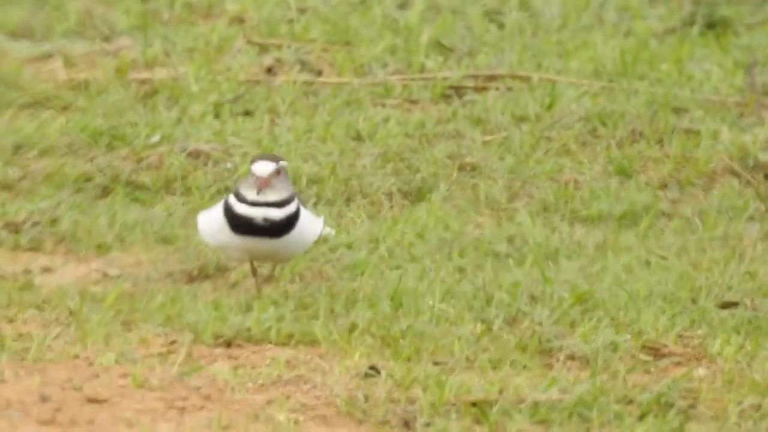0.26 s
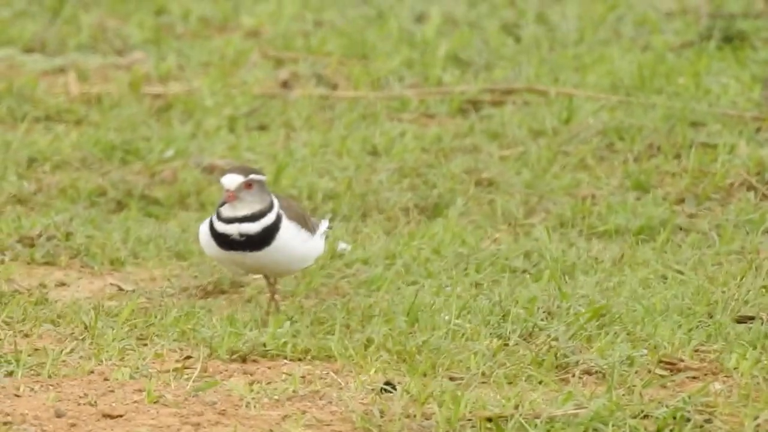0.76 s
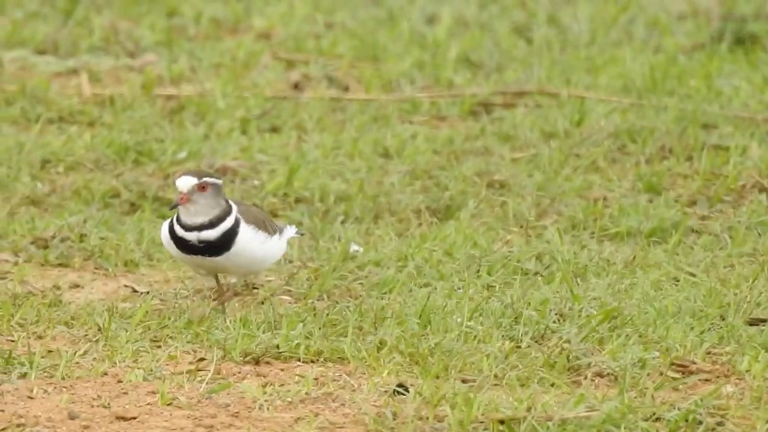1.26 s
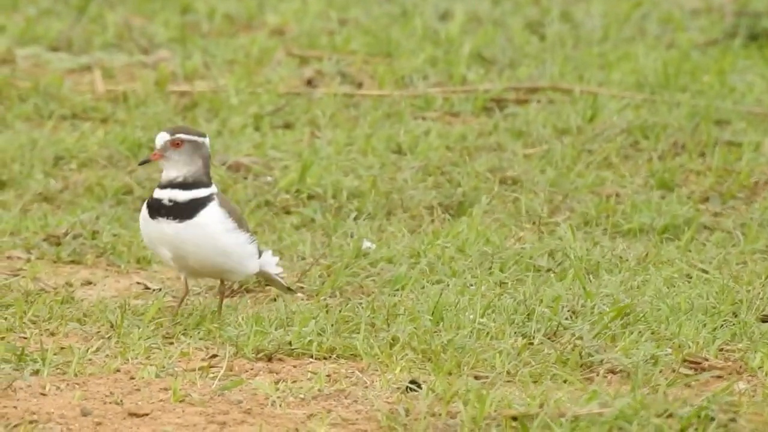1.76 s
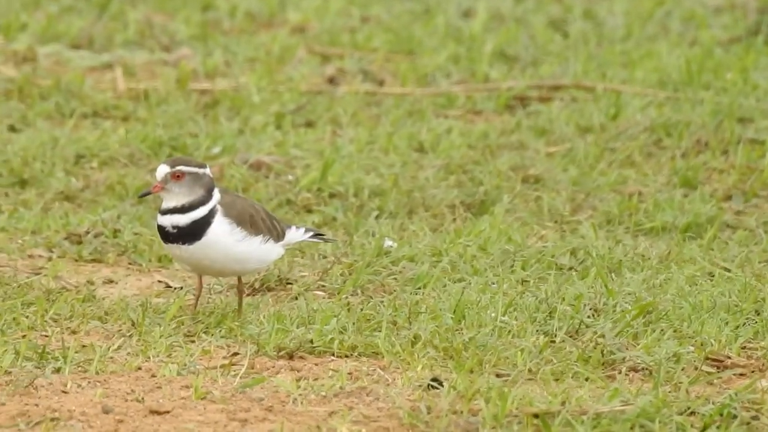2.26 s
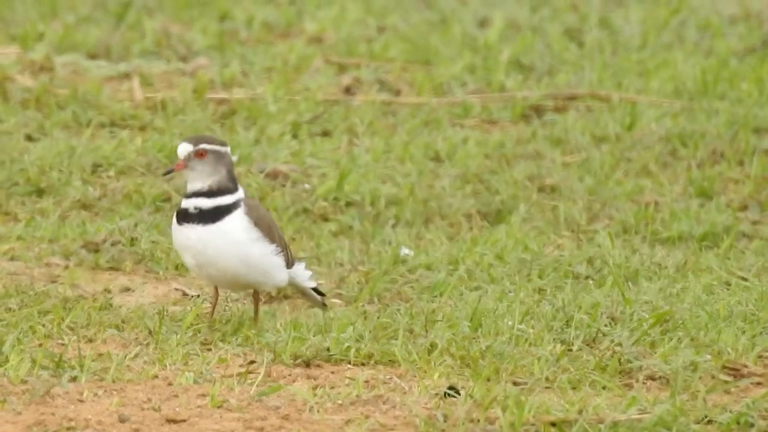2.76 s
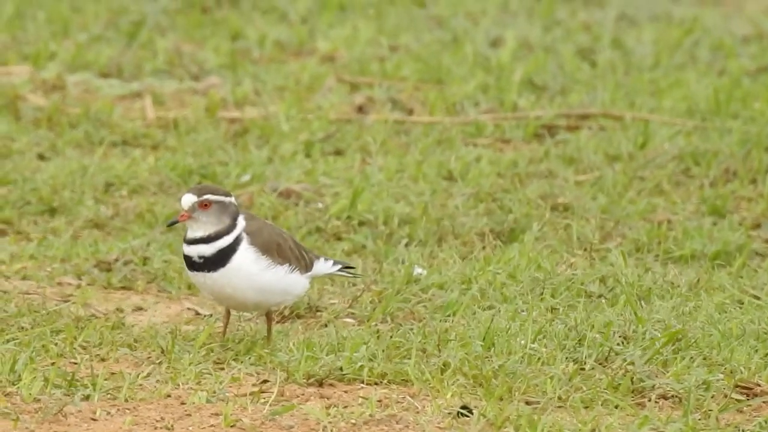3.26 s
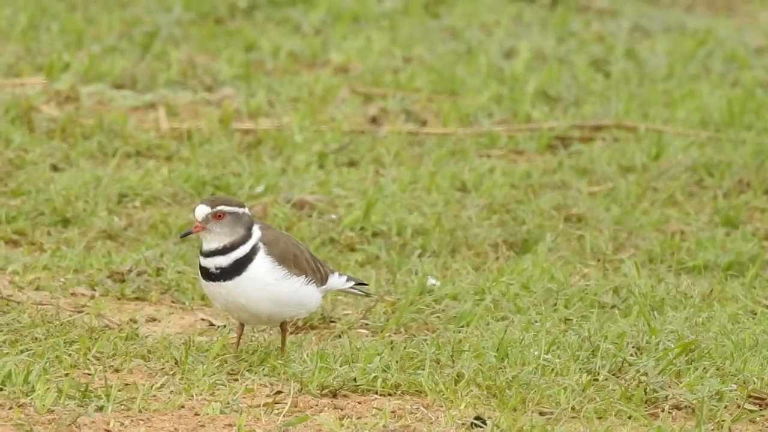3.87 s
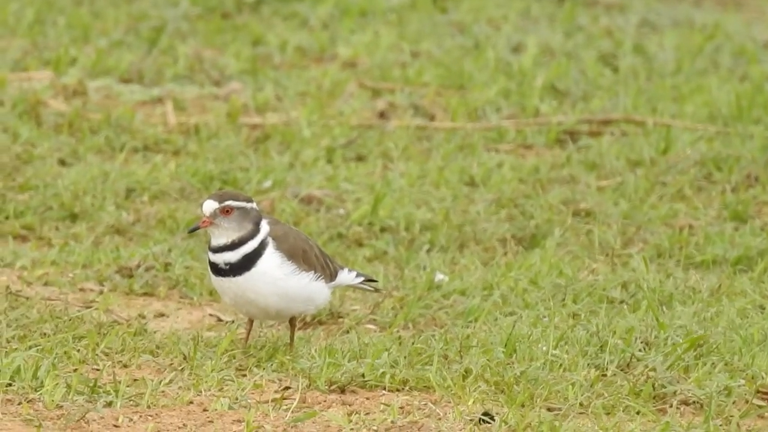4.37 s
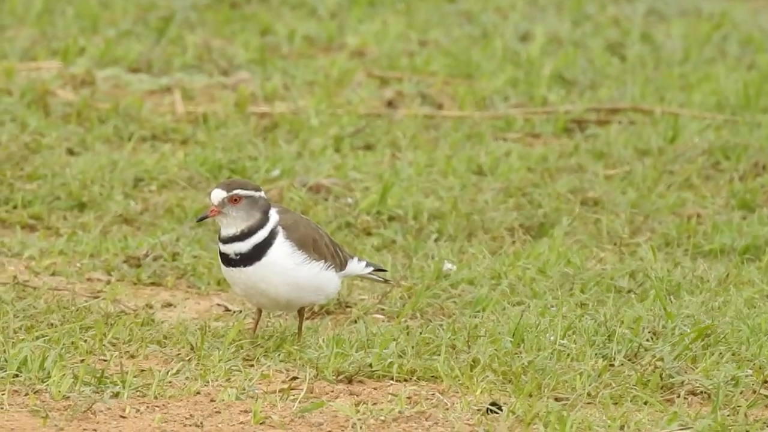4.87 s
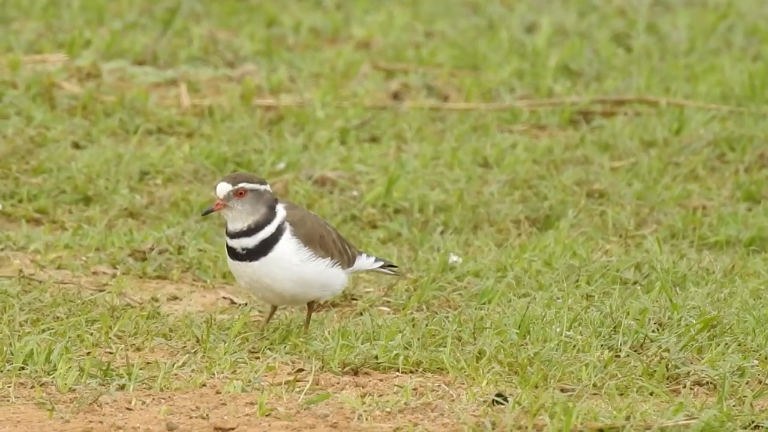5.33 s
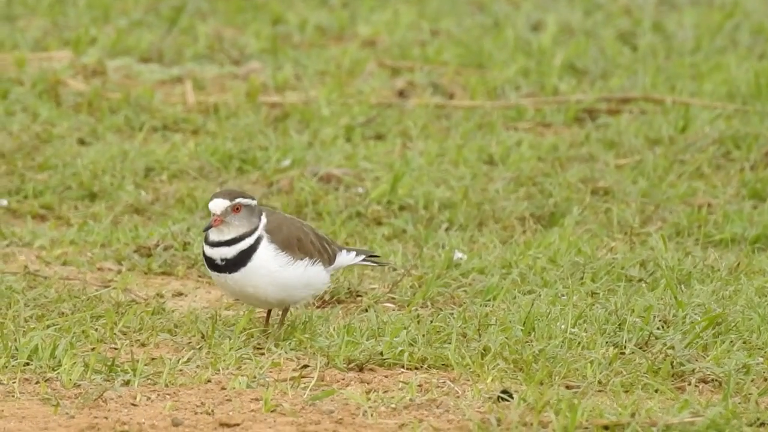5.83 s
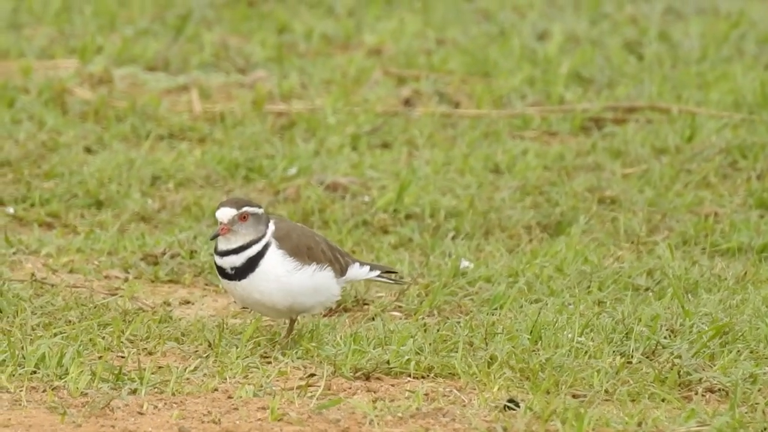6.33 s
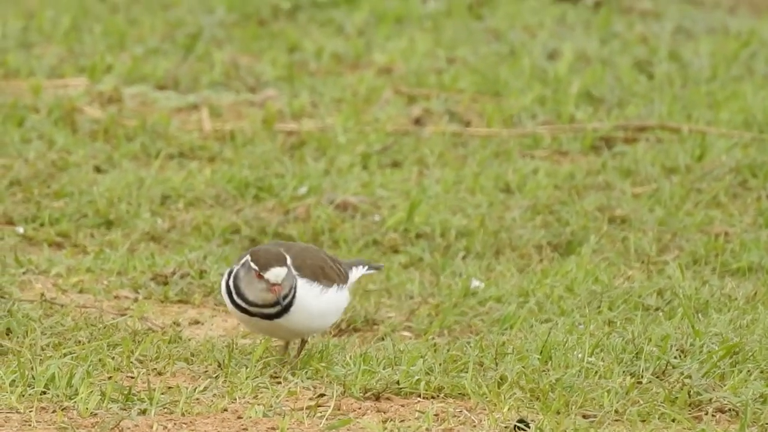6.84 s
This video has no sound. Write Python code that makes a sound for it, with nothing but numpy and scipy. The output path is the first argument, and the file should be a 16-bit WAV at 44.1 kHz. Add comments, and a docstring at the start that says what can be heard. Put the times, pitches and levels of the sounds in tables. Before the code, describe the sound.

In open country near water, distant waterfowl give faint nasal cries over a soft, steady hiss. A far plover calls twice, and a songbird slurs a thin falling phrase among tiny peeps. Then a plover close to the microphone gives five short, sharp, high whistles, three and then two, each flicking upward at the end. They are far louder than everything else.

```python
"""Plovers by the water

Over a soft outdoor hiss, distant waterfowl give nasal cries, a songbird slurs thin whistles and small
birds peep. A far plover calls twice; then one close by on short grass gives five sharp rising whistles.
Each is a near sine from the syrinx, opened by a stutter of ticks and scattered by grass, banks and
bushes. The loudest notes just clip."""
import sys
import numpy as np
from scipy import signal
from scipy.fft import rfft, irfft
from scipy.io import wavfile

SR = 44100
rng = np.random.default_rng(int(sys.argv[2]) if len(sys.argv) > 2 else 0)


def dump_mix(stems):
    """Bounce the given channels to the path in sys.argv[1] as a 16-bit WAV at rate SR."""
    frames = np.atleast_2d(stems).T  # one column per channel
    limited = np.clip(frames, -1, 1)  # hard clip at full scale
    pcm = np.round(limited * 32767).astype(np.int16)
    wavfile.write(sys.argv[1], SR, pcm)


N = 313110
TIME = np.arange(N) / SR

# The colour of the hiss. Each row: frequency in Hz, relative spectral level in dB.
HISS_SPECTRUM = [(500, -57), (700, -51), (900, -35), (1100, -26.5), (1400, -15), (1800, -12), (2300, -3),
                 (2800, 1), (3400, -1), (4700, -4), (8000, -8), (15000, -12.5)]
# The nearer waterfowl. Each row: start in seconds, length in seconds, top pitch in Hz,
# final fall as a share of that pitch, relative level in dB, throat resonance in Hz.
FOWL_CRIES = [(-.15, .34, 499, 0.07, -63, 1824), (0.391, 0.35, 544, 0.088, -55.5, 2080),
              (0.707, .27, 556, 0.14, -59.5, 2130), (1.0, .46, 495.6, .09, -62, 1660),
              (1.45, 0.31, 472, 0.088, -68.5, 1500), (2.04, 0.4, 543, 0.13, -56.5, 2040),
              (2.23, .14, 516, 0.059, -56, 1480), (2.339, 0.23, 555, 0.11, -59.5, 2070),
              (3.329, .42, 491.5, .076, -62.5, 1510), (3.657, 0.25, 538, 0.054, -58.5, 2200),
              (4.45, .36, 501.5, 0.054, -59, 1370), (5.03, 0.57, 499.3, .16, -61, 1730),
              (5.02, .4, 512, .07, -56.5, 3010), (5.598, 0.17, 483.6, .041, -60, 1370),
              (5.919, .2, 523, 0.054, -64, 2190)]
# Three timbres: nasal waterfowl, far birds (air swallows their overtones) and the close plover.
# Each row: multiple of the pitch, relative level in dB.
NASAL_HARMONICS = [(3, -4), (4, 1), (5, 2), (6, 0)]
DISTANT_HARMONICS = [(1, 1.5), (2, -45)]
PLOVER_HARMONICS = [(1, 0), (2, -30), (3, -46)]
# The songbird's two slurs, one falling, one stepped and dipping.
# Each row of a slur: time in seconds, pitch in Hz, relative level in dB.
SONG_SLURS = [
    [(2.83, 4850, -61), (2.85, 4808, -51), (2.924, 4420, -51.5), (2.976, 4240, -44.5), (3.02, 4106, -49),
     (3.052, 4000, -41), (3.075, 3750, -65)],
    [(3.165, 4308, -58), (3.189, 4066, -47), (3.225, 4113, -46.5), (3.269, 4180, -52), (3.285, 3880, -56),
     (3.325, 3856, -46.5), (3.419, 3560, -46), (3.479, 3510, -47), (3.595, 3615, -59), (3.61, 3725, -68)],
]
# The phrase comes three times, the first just a tail. Each row: time shift in seconds, gain in dB,
# stretch factor of the pitch range around the song's low note.
SONG_REPEATS = [(-3.492, 13, 1.6), (0, 3.5, 1), (4.15, 7.5, 1)]
# Faint small birds. Each row: start in seconds, length in seconds, top pitch in Hz, relative level in dB.
PEEPS = [(1.031, .26, 3440, -65.5), (3.143, 0.075, 3140, -56), (3.207, .05, 3720, -55.5),
         (3.354, .07, 3320, -51.5), (4.006, .04, 3280, -58.5), (5.383, 0.087, 3245, -50.5),
         (5.456, 0.03, 3550, -56), (5.472, .041, 3150, -53), (5.68, .04, 3020, -57)]
# Plover notes, far and near. Each row: start and length in seconds; crest, middle and flick pitch in Hz;
# base level, fade and dip in dB; number of opening ticks, their spacing in seconds,
# last tick's pitch in Hz, last and first tick's level in dB.
FAR_NOTES = [(1.700, .106, 4910, 4665, 5610, -41.5, -3, 2, 1, .008, 4400, -55, -55),
             (1.972, .048, 4790, 4874, 5560, -34, 1.5, 0.35, 2, 0.008, 4470, -43, -46)]
NEAR_NOTES = [(4.603, 0.098, 4862, 4510, 5440, -3, 14, 3, 2, .0074, 4645, -17, -21.5),
              (4.876, 0.049, 4760, 4880, 5470, -6, 6.5, 6.5, 3, 0.0084, 4513, -14, -28),
              (5.164, 0.058, 4740, 4730, 5423, -6.5, 4, 4, 4, 0.0082, 4527, -8, -37),
              (5.840, .081, 4764, 4505, 5370, -3, 10.5, 9.5, 3, .0074, 4520, -9.5, -31.5),
              (6.135, .051, 4633, 4634, 5183, -8, 7.5, 2, 4, 0.0079, 4570, -23, -33)]


def from_db(db):
    """Decibels to gain."""
    return 10 ** (np.asarray(db) / 20)


def unit_rms(x):
    """Scale to unit power."""
    return x / np.sqrt(np.mean(x ** 2) + 1e-20)


def ease(u):
    """A smooth step from 0 to 1."""
    return np.sin(np.pi / 2 * np.clip(u, 0, 1)) ** 2


def filtered(x, order, hz, kind):
    """A Butterworth low, high or band pass."""
    return signal.sosfilt(signal.butter(order, hz, kind, fs=SR, output="sos"), x)


def drift(rate_hz):
    """Smooth random modulation of unit power."""
    return unit_rms(filtered(rng.standard_normal(N + SR), 4, rate_hz, "low")[SR:])


def partials(hz, harmonics):
    """A harmonic tone that follows a pitch curve."""
    phase = 2 * np.pi * (np.cumsum(hz) / SR + rng.random())
    return sum(from_db(db) * np.sin(k * phase) for k, db in harmonics)


def during(start, length):
    """The samples of an event and its progress from 0 to 1."""
    at = np.flatnonzero((TIME > start) & (TIME < start + length))
    return at, (TIME[at] - start) / length


def scatter(x, t60, build_s):
    """Diffuse echoes from grass, banks and bushes build up, then die away."""
    t = TIME[:SR]
    echoes = rng.standard_normal(SR) * from_db(-60 * t / t60) * (1 - np.exp(-(t / build_s) ** 2))
    return signal.fftconvolve(x, echoes / np.linalg.norm(echoes))[:N]


def outdoor_hiss(level_db):
    """A steady bed of open-country air, with no bass."""
    points_hz, points_db = np.transpose(HISS_SPECTRUM)
    hz = np.maximum(np.arange(N // 2 + 1) * SR / N, 1)
    colour = from_db(np.interp(np.log(hz), np.log(points_hz), points_db))
    return from_db(level_db) * unit_rms(irfft(rfft(rng.standard_normal(N)) * colour, N))


def waterfowl(cries, scoop, crest_at, waver, throat_octaves):
    """Nasal cries scoop up, then sink as they fade; the throat favours the harmonic nearest its resonance."""
    out, wobble, fading = np.zeros(N), drift(40), drift(15)
    for start, length, hz, fall, db, throat_hz in cries:
        at, u = during(start, length)
        onset_bend = scoop * np.maximum(1 - u / crest_at, 0) ** 2
        tail_bend = fall * (np.maximum(u - crest_at, 0) / (1 - crest_at)) ** 1.1
        pitch = hz * (1 - onset_bend - tail_bend) * (1 + waver * wobble[at])
        swell = np.sin(np.pi * u ** .93) ** .61 * from_db(db + 2 * fading[at])
        colour = [(k, level - 10 * np.log10(1 + (np.log2(k * hz / throat_hz) / throat_octaves) ** 2))
                  for k, level in NASAL_HARMONICS]
        out[at] += swell * partials(pitch, colour)
    return out


def flock(level_db, count):
    """Short random cries from farther out on the water, as rows like those of FOWL_CRIES."""
    low = [-.2, .09, 395, .04, level_db - 1.5, 1300]
    high = [N / SR, .26, 550, .13, level_db, 3000]
    return rng.uniform(low, high, (count, 6))


def whistle(at, pitch, gain, harmonics, waver, flutter_db):
    """The syrinx sings a near sine with a slight tremble in pitch and strength."""
    out, tremble, flutter = np.zeros(N), drift(300), drift(250)
    effort_db = 40 * np.log2(pitch / np.median(pitch))   # the octave swells as the pitch is pushed up
    colour = [(k, level + effort_db * (k == 2)) for k, level in harmonics]
    tone = partials(pitch * (1 + waver * tremble[at]), colour)
    out[at] = gain * from_db(flutter_db * flutter[at]) * tone
    return out


def songbird(edge_s, low_note_hz, waver, flutter_db):
    """A thin slurred phrase that comes back every few seconds."""
    out = np.zeros(N)
    for shift, gain_db, stretch in SONG_REPEATS:
        for slur in SONG_SLURS:
            times, hz, db = np.transpose(slur)
            at, _ = during(times[0] + shift, times[-1] - times[0])
            if len(at):
                t = TIME[at] - shift
                gate = ease(np.minimum(t - times[0], times[-1] - t) / edge_s)
                gain = gate * from_db(np.interp(t, times, db) + gain_db)
                pitch = low_note_hz + stretch * (np.interp(t, times, hz) - low_note_hz)
                out += whistle(at, pitch, gain, DISTANT_HARMONICS, waver, flutter_db)
    return out


def small_birds(bend):
    """Short peeps that arch in pitch and level."""
    out = np.zeros(N)
    for start, length, hz, db in PEEPS:
        at, u = during(start, length)
        pitch = hz * (1 - bend * (u - .5) ** 2)
        out[at] += from_db(db) * np.sin(np.pi * u) * partials(pitch, DISTANT_HARMONICS)
    return out


def ticks(notes, lead_s=.0029, first_s=.0024, last_s=.0062, first_drop=.14):
    """Evenly spaced ticks lead into each note, growing longer, higher and louder."""
    for start, *_, count, spacing, hz, last_db, first_db in notes:
        for k in range(count):   # counting back from the note
            early = (k / max(count - 1, 1)) ** 2.8
            peak_s = start - lead_s - k * spacing
            db = last_db + (first_db - last_db) * early
            length = last_s + (first_s - last_s) * early
            yield peak_s, hz * (1 - first_drop * early), db, length


def plover_stutter(notes, sag, collapse, snap_db, snap_t60, rasp_db, rasp_t60, rasp_hz, throat_db):
    """The syrinx opens in bursts: each snaps, drops in pitch as it dies and leaves a rasp in the throat."""
    bursts, snaps = np.zeros(N), np.zeros(N)
    for peak_s, hz, db, length in ticks(notes):
        at, u = during(peak_s - length / 3, length)
        pitch = hz * (1 + sag * (.5 - u) - collapse * u ** 4)
        swell = from_db(db) * np.sin(np.pi * u ** .66) ** 1.87
        bursts[at] += swell * partials(pitch, PLOVER_HARMONICS)
        snaps[at[len(at) // 5]] += from_db(min(db, -22))   # strong bursts turn to tone, snap no harder
    t = TIME[:SR // 20]
    decay = from_db(snap_db - 60 * t / snap_t60) + from_db(rasp_db - 60 * t / rasp_t60)
    noise = signal.fftconvolve(snaps, decay)[:N] * rng.standard_normal(N)
    rasp = filtered(noise, 4, rasp_hz, "band")
    throat = filtered(noise, 2, 3390 * np.exp([-.07, .07]), "band")   # a narrow resonance
    return bursts + rasp + from_db(throat_db) * throat


def plover_whistles(notes, harmonics, waver, flutter_db):
    """Each note scoops up to a crest, eases to its middle pitch and ends in an upward flick."""
    scoop, scoop_s, crest_s, settle_before_end_s = .025, .0035, .011, .031
    flick_before_end_s, flick_width_s = .0055, .005
    open_s, attack_db, attack_s, release_s = .0014, 9.5, .005, .0052
    dip_at, dip_width = .42, .06   # shares of the note
    out = np.zeros(N)
    for start, length, crest_hz, middle_hz, flick_hz, db, fade_db, dip_db, *_ in notes:
        at, u = during(start, length)
        t = u * length
        settled = ease((t - crest_s) / max(length - settle_before_end_s - crest_s, crest_s))
        held = crest_hz * (1 - scoop * np.exp(-t / scoop_s)) + (middle_hz - crest_hz) * settled
        flick = (flick_hz - middle_hz) / np.cosh((length - t - flick_before_end_s) / flick_width_s)
        dip = dip_db * np.exp(-((u - dip_at) / dip_width) ** 2)
        level_db = db - attack_db * np.exp(-t / attack_s) - fade_db * u - dip
        gate = ease(t / open_s) * ease((length - t) / release_s)
        out += whistle(at, held + flick, gate * from_db(level_db), harmonics, waver, flutter_db)
    return out


def scene():
    """The mix: one plover up front and fairly dry, the other far and wetter, the rest low behind them."""
    near = plover_whistles(NEAR_NOTES, PLOVER_HARMONICS, waver=.001, flutter_db=.93)
    near += plover_stutter(NEAR_NOTES, sag=.01, collapse=.3, snap_db=.5, snap_t60=.0035,
                           rasp_db=-10.5, rasp_t60=.036, rasp_hz=(2750, 5500), throat_db=0)
    ground = from_db(-19) * scatter(near, t60=.12, build_s=.005)
    # Grass blades scatter short waves best; long paths through foliage dull the top of each flick.
    grass = from_db(-9) * scatter(filtered(near, 8, 8200, "high"), t60=.14, build_s=.0016)
    foliage = from_db(-21) * scatter(filtered(near, 8, 5100, "low"), t60=.47, build_s=.015)
    near += ground + grass + foliage

    far = plover_whistles(FAR_NOTES, DISTANT_HARMONICS, waver=.0044, flutter_db=2)
    far += plover_stutter(FAR_NOTES, sag=.1, collapse=.45, snap_db=2, snap_t60=.0038,
                          rasp_db=-4.5, rasp_t60=.035, rasp_hz=(2600, 3800), throat_db=-8)
    far += from_db(-5.5) * scatter(far, t60=.56, build_s=.004)

    song = songbird(edge_s=.003, low_note_hz=3575, waver=.0024, flutter_db=.74) + small_birds(bend=.25)
    song += from_db(-23) * scatter(song, t60=.3, build_s=.006)

    fowl = waterfowl(FOWL_CRIES, scoop=.06, crest_at=.24, waver=.005, throat_octaves=.19)
    fowl += waterfowl(flock(level_db=-68, count=70), scoop=.08, crest_at=.4, waver=.0044,
                      throat_octaves=.23)
    fowl = from_db(-3.5) * fowl + from_db(-9.5) * scatter(fowl, t60=.21, build_s=.01)
    return (near + far + song + fowl + outdoor_hiss(level_db=-56.69))[None]


def record(dry):
    """The loudest crests clip, a little unevenly; a steep low pass trims the very top."""
    clipped = np.clip(dry, -.535, .515)
    lowpass = signal.firwin(401, 15900, fs=SR, window=("kaiser", 9))
    return signal.fftconvolve(clipped, lowpass[None], mode="same", axes=1)


dry = scene()
out = record(dry)
dump_mix(out)
```